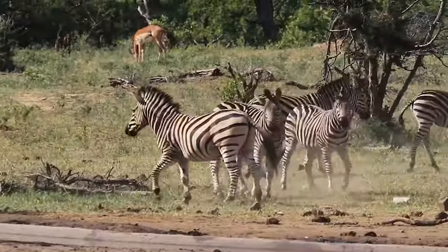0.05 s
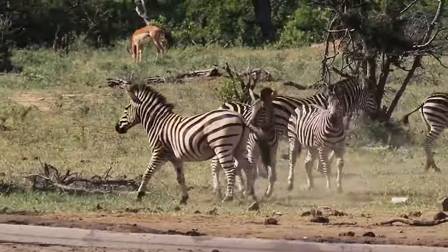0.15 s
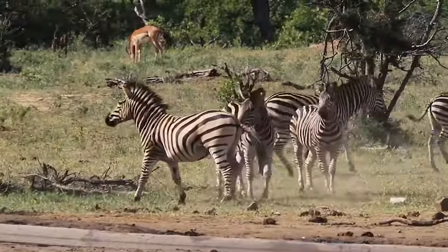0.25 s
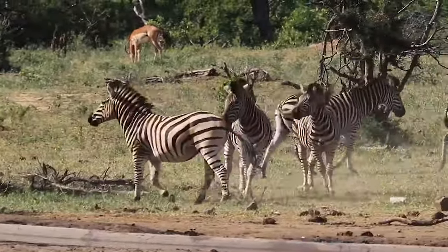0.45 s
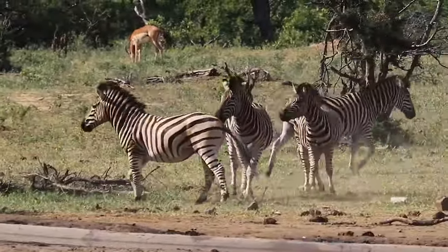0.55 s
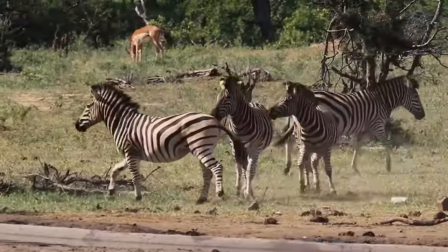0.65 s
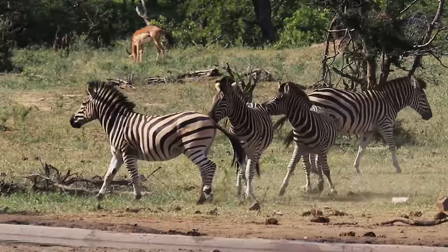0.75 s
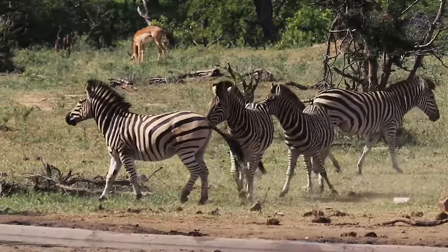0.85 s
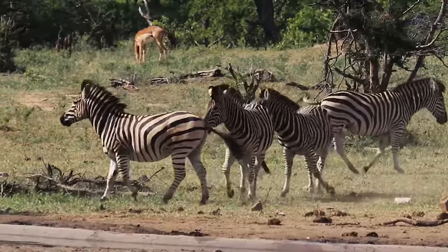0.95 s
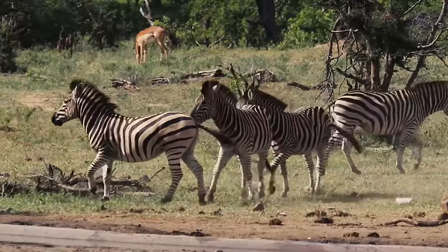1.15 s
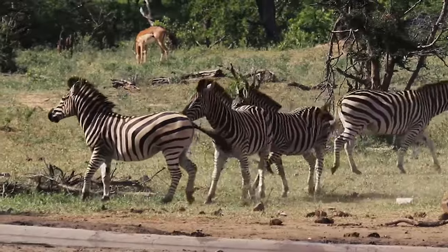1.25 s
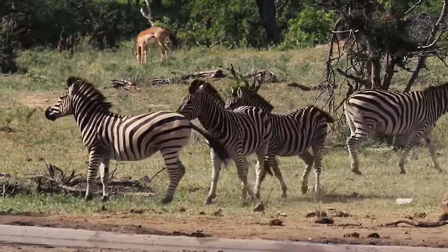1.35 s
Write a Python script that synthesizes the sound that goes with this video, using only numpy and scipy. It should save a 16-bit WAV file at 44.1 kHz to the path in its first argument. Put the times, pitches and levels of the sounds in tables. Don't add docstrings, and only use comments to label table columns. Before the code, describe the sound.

One thin, clear zebra whistle falls in pitch on open grassland, echoing faintly off trees; hooves scuff dry grass, small birds chip, one buzzes briefly, then another rattles in fast ticks, with steady microphone hiss.

```python
import sys
import numpy as np
from scipy import signal
from scipy.io import wavfile
from scipy.ndimage import uniform_filter1d

SR = 44100
rng = np.random.default_rng(int(sys.argv[2]) if len(sys.argv) > 2 else 0)


def dump(signal):
    limited = np.clip(np.atleast_2d(signal).T, -1, 1)
    pcm = np.round(limited * 32767).astype(np.int16)
    wavfile.write(sys.argv[1], SR, pcm)


def volts_from_db(level):
    exponent = np.asarray(level, float) / 20
    return 10 ** exponent


N = 61739
T = np.arange(N) / SR


def evened(x):
    return x / np.sqrt(np.mean(x ** 2) + 1e-20)


def add(mix, s, sound):
    part = mix[round(s * SR):][:len(sound)]
    part += sound[:len(part)]


def curve(points):
    return np.interp(T, *np.transpose(points))


def resonate(x, hz, width):
    turn = np.exp(2j * np.pi * np.cumsum(hz * np.ones(len(x))) / SR)
    r = np.exp(-np.pi * width / SR)
    return 2 * (turn * signal.lfilter([1 - r], [1, -r], x / turn)).real


def resonate_twice(x, hz, width):
    return resonate(resonate(x, hz, width), hz, width)


def wander(per_s):
    return evened(signal.lfilter(*signal.butter(2, per_s, fs=SR), rng.standard_normal(N)))


def noise(points, patchy_db):
    hz = np.fft.rfftfreq(512, 1 / SR)
    f, db = np.transpose(points)
    a, b, patch = rng.standard_normal((N // 128 + 5, 257, 3)).T
    patch = uniform_filter1d(patch, size=5, axis=0)
    patch = evened(uniform_filter1d(patch, size=10, axis=1))
    shape = np.interp(np.log(hz + 1), np.log(f), db)[:, None]
    bins = (a + 1j * b) * volts_from_db(shape + patchy_db * patch)
    return evened(signal.istft(bins, nperseg=512, noverlap=384)[1][:N])


def note(length, first_hz, last_hz, db, octave_db, rough_db=0):
    bow, waver, level_rough_db, edge = 0.049, .005, 1.2, .6
    u = np.arange(round(length * SR)) / (length * SR)
    hoarse = uniform_filter1d(rng.standard_normal((3, 4000)), size=90)
    hoarse = uniform_filter1d(hoarse, size=90)[:, :len(u)] * 12
    glide = first_hz + (last_hz - first_hz) * u
    hz = glide * (1 + bow * (np.sin(np.pi * u) - .5) + waver * hoarse[0])
    turns = 2 * np.pi * np.cumsum(hz) / SR
    shape = volts_from_db(db + level_rough_db * hoarse[1]) * np.sin(np.pi * u) ** edge
    octave = volts_from_db(octave_db + rough_db * hoarse[2]) * np.sin(2 * turns)
    return np.sqrt(2) * shape * (np.sin(turns) + octave)


# frequency [Hz], density [dB per Hz].
HISS_COLOUR = [(35, -78), (60, -45), (254, -43), (445, -14.5), (1080, -3.5), (2930, -2.5), (3970, -2.5),
               (14300, -2.5), (15700, -6.5)]


def microphone_hiss():
    hiss = np.array([noise(HISS_COLOUR, patchy_db=0.0), noise(HISS_COLOUR, patchy_db=0.0)])
    return volts_from_db(-49 - 5.5) * hiss


# frequency [Hz], density [dB per Hz].
FIELD_COLOUR = [(60, -28), (200, -35.5), (400, -11.5), (600, -1), (900, 3), (1500, -0.5), (2400, -10.5),
                (4500, -14.5), (9000, -18.5)]


def far_field():
    return volts_from_db(-52.5) * noise(FIELD_COLOUR, patchy_db=0.5)


# start [s], level [dB], decay time [s].
HOOF_SCUFFS = [
    (0.29, -38.5, 0.004),
    (.297, -38.5, 0.006),
    (0.353, -46.5, 0.0086),
    (.385, -44, 0.0073),
    (.402, -47, 0.0051),
    (0.412, -51, 0.0056),
    (0.514, -58, .006),
    (0.981, -52, .005),
]


def hoof_scuffs():
    out = np.zeros(N)
    for s, db, decay in HOOF_SCUFFS:
        add(out, s, volts_from_db(db) * np.exp(-T[:3000] / decay) * rng.standard_normal(3000))
    out = 3 * resonate_twice(out, 1900, 2360)
    return signal.lfilter(*signal.butter(2, 900, "high", fs=SR), out)


# time [s], level [dB].
GRASS_SWELL = [(0, -46), (.1, -52.5), (.16, -48.5), (.21, -53), (.3, -50.5), (.41, -54.5), (.5, -52),
               (.6, -61), (.68, -48.5), (.8, -57), (.92, -52.5), (.97, -57), (1.0, -53), (1.1, -49.5),
               (1.2, -52.5), (1.3, -55.5), (1.4, -54)]
# frequency [Hz], density [dB per Hz].
GRASS_COLOUR = [(600, -18), (1200, -5), (2200, 3), (3400, 0), (4800, -5.5), (7000, -15.5), (11000, -25.5)]


def grass_rustle():
    level_db = curve(GRASS_SWELL) + 0.73 * wander(28)
    return noise(GRASS_COLOUR, patchy_db=2.2) * volts_from_db(level_db)


# start [s], level [dB], pitch [Hz].
DOVE_PULSES = [(0.761, -48, 876), (0.83, -46, 996), (0.847, -42.5, 909), (0.869, -43.5, 877),
               (0.889, -45.5, 958), (0.919, -47, 944), (0.948, -45.5, 910), (0.982, -44, 951),
               (1.017, -43, 890), (1.054, -44, 900), (1.088, -47, 874), (1.124, -46, 883),
               (1.168, -47.5, 809), (1.2, -45.5, 873), (1.226, -46, 845), (1.269, -56, 820)]


def dove():
    length_s, trim_db, sag = .019, -4.5, .04
    out = np.zeros(N)
    for s, db, hz in DOVE_PULSES:
        add(out, s, note(length_s, hz * (1 + sag), hz * (1 - sag), db + trim_db, -45))
    return out


# start [s], length [s], first pitch [Hz], last pitch [Hz], level [dB].
TWITTER_NOTES = [
    (.004, 0.02, 1900, 1940, -50.5),
    (.022, 0.024, 1900, 1853, -53),
    (0.134, 0.037, 1777, 1816, -54),
    (0.364, 0.017, 1367, 1426, -52),
    (0.391, 0.022, 1540, 1425, -49),
    (0.727, 0.022, 1800, 1880, -52.5),
    (0.749, .014, 1830, 1730, -52),
    (1.093, 0.028, 1828, 1820, -50),
    (1.149, 0.04, 1885, 1863, -56.5),
]
# start [s], length [s], first pitch [Hz],
# last pitch [Hz], level [dB].
PURE_CHIPS = [(.024, .02, 2350, 2380, -47.5), (.046, 0.013, 2380, 2330, -50),
              (.06, 0.014, 2330, 2310, -43.5), (.08, .014, 2420, 2270, -48), (.054, 0.039, 1950, 1880, -50),
              (.136, .012, 2700, 3500, -54), (0.17, .008, 3550, 3950, -51), (.07, .03, 1150, 1100, -56),
              (0.63, 0.012, 3200, 3450, -53), (.498, .008, 3530, 3530, -53), (.514, .009, 3520, 3480, -55),
              (.454, 0.0076, 1750, 1674, -54), (.538, 0.015, 2650, 2600, -54),
              (0.18, 0.013, 2890, 3250, -48.5), (0.18, 0.027, 2740, 2610, -46.5),
              (.282, 0.017, 3940, 4700, -47.5), (0.892, 0.029, 1930, 1820, -48),
              (0.98, 0.014, 3480, 3440, -45), (1, .011, 3400, 3250, -48), (.676, .02, 3700, 3720, -46),
              (.676, .022, 1880, 1860, -47), (.914, .02, 1720, 1670, -50), (0.486, 0.0227, 2030, 1700, -48),
              (0.507, 0.017, 1600, 1900, -45.5), (.31, 0.015, 914, 890, -49),
              (.865, 0.058, 590, 577, -58.5), (.887, 0.0099, 2700, 2970, -52),
              (.045, 0.034, 5200, 4670, -58.5), (0.654, 0.015, 1900, 2250, -56),
              (0.66, 0.016, 2830, 2840, -39.5), (0.77, 0.015, 2866, 2790, -47),
              (0.704, 0.022, 1408, 1370, -53), (.722, 0.0099, 2800, 2480, -51),
              (.758, 0.027, 2860, 2850, -57), (.782, 0.025, 2600, 2840, -57),
              (1.076, 0.017, 2854, 2680, -39.5), (1.077, 0.013, 2202, 2180, -43.5),
              (1, 0.03, 2680, 2640, -53), (1.378, 0.012, 2905, 2830, -52),
              (0.286, .012, 1267, 1260, -47.5),
    (0.386, 0.024, 3066, 3016, -43),
    (.405, 0.021, 2420, 2440, -46.5),
    (0.407, 0.0098, 3130, 3200, -48),
    (0.412, .011, 3500, 3500, -53),
    (.426, 0.019, 2520, 1830, -49),
    (0.357, 0.012, 3350, 3270, -49),
    (.36, 0.017, 4300, 4300, -56),
]


def twitterers():
    out = np.zeros(N)
    for s, *glide in TWITTER_NOTES:
        add(out, s, note(*glide, octave_db=-2, rough_db=1.5))
    for s, *glide in PURE_CHIPS:
        add(out, s, note(*glide, octave_db=-19.5))
    return out


# time [s], level [dB].
RASP_SWELL = [
    (.975, -77),
    (.99, -54.5),
    (1.1, -48.5),
    (1.19, -53.5),
    (1.21, -59.5),
    (1.33, -57.5),
    (1.35, -89),
]


def rasp():
    grain = rng.standard_normal(N) * volts_from_db(3.9 * wander(130))
    band = resonate_twice(grain, 3450, 620)
    return evened(band) * volts_from_db(curve(RASP_SWELL))


# time [s], level [dB].
HAZE_SWELL = [
    (.975, -75),
    (.99, -60),
    (1.014, -54),
    (1.12, -54),
    (1.236, -56.5),
    (1.25, -58),
    (1.33, -58),
    (1.35, -88),
]
# frequency [Hz], width [Hz], level [dB].
RATTLE_THROAT = [(5400, 770, 1), (6920, 800, -8.5), (8500, 1200, -7.5)]


def rattle_haze():
    breath = rng.standard_normal(N) * volts_from_db(3 * wander(150))
    haze = np.zeros(N)
    for hz, width, db in RATTLE_THROAT:
        haze += volts_from_db(db) * evened(resonate_twice(breath, hz, width))
    return evened(haze) * volts_from_db(curve(HAZE_SWELL))


# time [s], main ring level [dB], main ring [Hz], upper ring level [dB], lower ring level [dB].
RATTLE_TICKS = [(0.9837, -48, 5280, -60, -53), (1.0014, -45, 5230, -61, -49), (1.0142, -38, 5620, -63, -52),
                (1.0214, -44, 5230, -60, -45), (1.038, -41, 5620, -60, -43), (1.058, -42, 5290, -51, -46),
                (1.0774, -40, 5440, -49, -46), (1.0959, -38, 5240, -49.5, -42),
                (1.1149, -40, 5470, -52, -44), (1.1343, -39.5, 5640, -59, -47),
                (1.1535, -40.5, 5580, -60, -50), (1.1722, -40.5, 5260, -59, -47),
                (1.1917, -40.5, 5690, -62, -52.5), (1.2112, -39.5, 5570, -65, -53),
                (1.2316, -43.5, 5700, -63, -50), (1.2515, -50, 5590, -67, -54),
                (1.2684, -49, 5340, -60, -50), (1.2896, -48, 5700, -61, -50), (1.308, -46, 5480, -62, -50),
                (1.3284, -51, 5200, -67, -61)]


def rattler():
    tick_len_s, upper_hz = .0043, 7100
    out = np.zeros(N)
    for s, db, hz, upper_db, lower_db in RATTLE_TICKS:
        lower_hz = 3350 * (1 + .05 * rng.standard_normal())
        rings = [(hz, db - 4.5), (upper_hz, upper_db), (lower_hz, lower_db - 4)]
        for ring_hz, ring_db in rings:
            ring_hz = ring_hz * (.99 + .005 * rng.standard_normal())
            add(out, s - .001, note(tick_len_s, 1.02 * ring_hz, .98 * ring_hz, ring_db, -60))
    return out + rattle_haze() + rasp()


# start [s], length [s], level [dB].
BUZZ_THROBS = [
    (.549, .004, -48),
    (.5595, .0052, -36),
    (.5652, .0042, -42),
    (.5704, .0026, -35.5),
    (.5736, .0038, -35),
    (.579, .005, -45),
]


def buzzer():
    start_s, length_s, swings_per_s = .5428, .039, 80
    mid_hz, swing_hz, drone_hz, step_hz = 7260, 1610, 5560, 1430
    t = np.arange(round(length_s * SR)) / SR
    swing = np.cos(2 * np.pi * swings_per_s * t)
    hz = mid_hz + swing_hz * np.tanh(1.3 * swing) + 350 * wander(930)[:len(t)]
    step = 2 * np.pi * (hz - drone_hz) / step_hz
    hz = hz - 190 * np.sin(step)
    level_db = -41 - swing + 3 * (np.cos(step) - .5) + 2.45 * wander(400)[:len(t)]
    trill = volts_from_db(level_db) * np.sin(2 * np.pi * np.cumsum(hz) / SR)
    out = np.zeros(N)
    add(out, start_s, trill * np.sin(np.pi * t / length_s) ** 0.12)
    out = out + 0.38 * np.roll(out, round(0.002 * SR))
    for s, length, db in BUZZ_THROBS:
        add(out, s, note(length, drone_hz, drone_hz, db, -55))
    return out


# time [s], fundamental level [dB], octave level [dB].
WHISTLE_STRENGTH = [
    (.222, -41, -60),
    (.23, -36, -40),
    (0.249, -35.5, -31.5),
    (.292, -33, -31.5),
    (.37, -35, -36.5),
    (.392, -34, -46.5),
    (.45, -37, -45),
    (.484, -43, -50.5),
    (.524, -57, -65),
]


def zebra():
    rise_s, droop_s, octave_end_s, flutter_db = 0.0044, .485, .494, 1.24
    s, db, octave_db = np.transpose(WHISTLE_STRENGTH)
    since = np.clip(T, s[0], s[-1]) - s[0]
    pitch = 3054 - 1630 * since - 400 * np.exp(-since / .0215)
    pitch -= 2300 * np.maximum(s[0] + since - droop_s, 0)
    turns = 2 * np.pi * np.cumsum(pitch) / SR
    gate = np.clip((T - s[0]) / rise_s, 0, 1) * np.clip((s[-1] - T) / rise_s, 0, 1)
    voice_break_db = 4 * np.clip((T - droop_s) / rise_s, 0, 1)
    first = volts_from_db(np.interp(T, s, db) + flutter_db * wander(54) - voice_break_db)
    second = volts_from_db(np.interp(T, s, octave_db) + flutter_db * wander(68))
    second *= np.clip((octave_end_s - T) / rise_s, .1, 1)
    third = volts_from_db(-67 + 3 * wander(30))
    tone = first * np.sin(turns) + second * np.cos(2 * turns) + third * np.sin(3 * turns)
    air = first * volts_from_db(-41) * evened(resonate(rng.standard_normal(N), pitch, 230))
    return gate * (np.sqrt(2) * tone + air)


def tree_line(x):
    t60_s, build_s, top_hz = 0.85, 0.01, 3500
    fade = volts_from_db(-60 * T[:SR] / t60_s) * np.clip(T[:SR] / build_s, 0, 1)
    taps = rng.standard_normal((3, SR)) * fade
    taps = taps[0] + 0.067 * taps[1:]
    taps = signal.lfilter(*signal.butter(2, top_hz, fs=SR), taps)
    taps = taps / np.linalg.norm(taps[0])
    return volts_from_db(-18.5) * signal.fftconvolve(x[None], taps, axes=1)[:, :N]


def scene():
    voices = dove() + twitterers() + rattler() + buzzer() + zebra()
    ground = hoof_scuffs() + grass_rustle()
    return voices + ground + tree_line(voices) + far_field()


def band_limit(x):
    return signal.sosfilt(signal.butter(12, 16760, fs=SR, output="sos"), x)


def record(dry):
    heard = dry + microphone_hiss()
    cut = signal.lfilter(*signal.butter(2, 267, "high", fs=SR), heard)
    edge = signal.firwin(1023, 15770, window=("kaiser", 10), fs=SR)
    mix = signal.oaconvolve(cut, edge[None], "same")
    return band_limit(mix)


dry = scene()
out = record(dry)
dump(out)
```